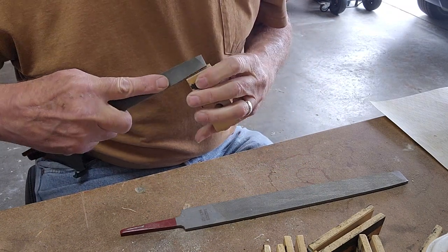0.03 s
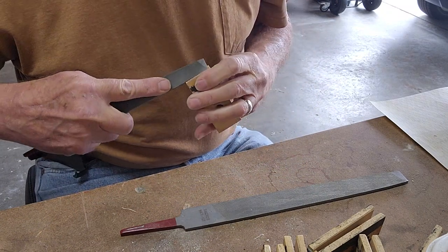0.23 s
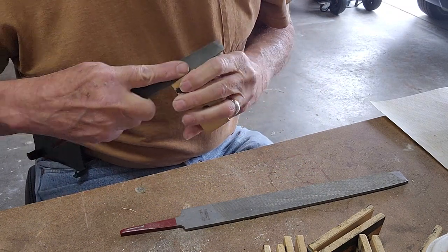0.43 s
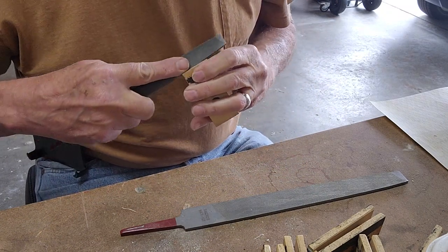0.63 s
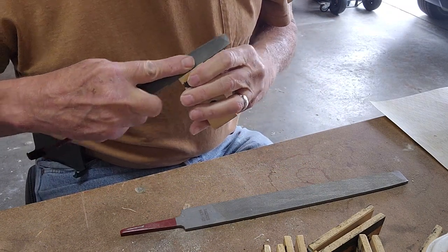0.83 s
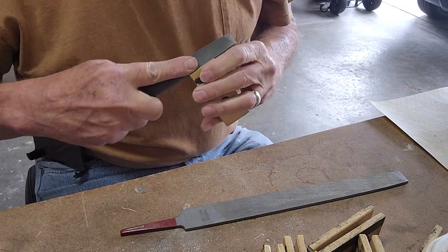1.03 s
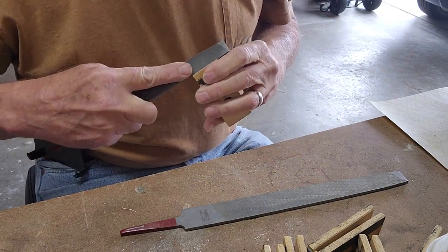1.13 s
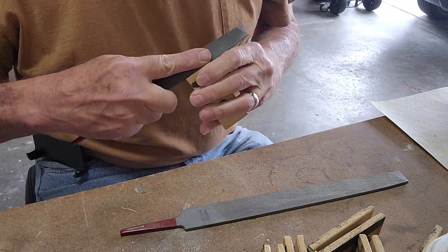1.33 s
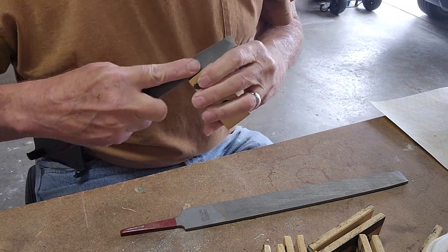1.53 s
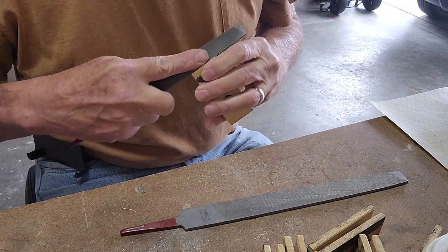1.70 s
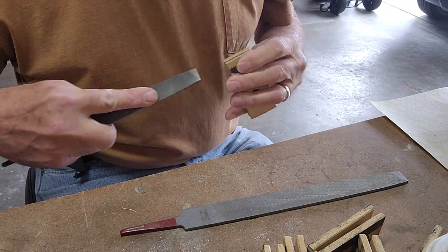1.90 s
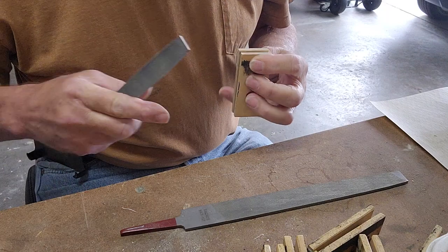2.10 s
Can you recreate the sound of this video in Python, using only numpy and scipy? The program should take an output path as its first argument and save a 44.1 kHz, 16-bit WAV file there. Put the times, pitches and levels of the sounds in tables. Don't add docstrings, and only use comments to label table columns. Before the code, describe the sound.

A steel hand file scrapes a small wooden block in about eight quick alternating strokes, starting after light taps, growing harder and brighter, then stopping; a close stereo microphone in a large workshop with faint low rumble.

```python
import sys
import numpy as np
from scipy import signal
from scipy.fft import rfft, irfft
from scipy.io import wavfile
from scipy.ndimage import uniform_filter1d

SR = 44100
rng = np.random.default_rng(int(sys.argv[2]) if len(sys.argv) > 2 else 0)


def bounce(signal):
    frames = np.transpose(np.atleast_2d(signal))
    limited = np.clip(frames, -1, 1)
    pcm = np.round(limited * 32767).astype(np.int16)
    wavfile.write(sys.argv[1], SR, pcm)


def invert_db(level):
    return 10 ** (np.asarray(level, dtype=float) / 20)


N = 95079
T = np.arange(N) / SR
HZ = np.arange(N // 2 + 1) * SR / N

# (frequency [Hz], density [dB/Hz])
RUMBLE_SWELL = [(0.0, -49.5), (0.44, -48), (0.47, -42), (0.6, -52), (0.75, -44), (0.8, -57.5), (1.03, -43),
                (1.09, -54.5), (1.29, -49), (1.32, -40), (1.89, -46.5), (1.93, -64), (1.98, -48),
                (2.15, -53)]
RUMBLE_SPECTRUM = [(20, -6), (33, -5), (44, 15), (55, 18.5), (68, 9.5), (100, -51.5)]
# (frequency [Hz], density [dB/Hz])
MOTOR_SPECTRUM = [(70, -28), (110, 4), (150, -3.5), (190, -7), (235, -59), (400, -68)]
AIR_SPECTRUM = [(200, -1), (300, -9), (380, 2.5), (500, -4), (2000, -12.5), (7500, -16.5), (9000, -41),
                (14000, -32)]
MOTOR_DB, AIR_DB = -59, -68.5

# (time [s], level [dB])
BENCH_SHAKE = [(0.0, -49.5), (0.12, -47), (0.17, -62), (0.21, -46.5), (0.39, -56), (0.47, -47.5),
               (0.65, -50.5), (0.68, -40.5), (0.79, -51.5), (0.87, -42.5), (0.96, -50), (1.15, -56),
               (1.19, -41), (1.78, -46.5), (1.83, -37), (1.97, -59), (1.99, -48.5), (2.15, -55)]
BENCH_HZ, BENCH_WIDTH_HZ = 86.35, 9

# (time [s], peak [dB], block pitch [Hz], steel pitch [Hz], contact [s])
TAPS = [(0.028, -54.5, 7220, 9560, 0.0093), (.031, -62, 6200, 13500, .01), (.07, -76, 1200, 4500, 0.0029),
        (.11, -68, 5200, 7100, 0.018), (.054, -55.5, 1145, 3235, 0.0022), (.056, -63.5, 1550, 2420, 0.0044),
        (0.128, -60.5, 820, 1850, 0.0023), (.131, -68, 3430, 5230, 0.0068),
        (0.292, -64.5, 1860, 3760, 0.0058), (.498, -61, 14000, 12330, 0.0018),
        (0.922, -67.5, 1100, 2000, 0.0029), (1.825, -77, 920, 2100, 0.005),
        (1.945, -59.5, 2700, 5500, 0.0064), (2.07, -64, 7400, 6480, 0.0071)]
TAP_WIDTH_HZ, TAP_STEEL_DB, TAP_CRACK_DB = 290, -1.5, -35

# (time [s], peak [dB], pitch [Hz], length [s])
SINGS = [(.321, -56, 3250, 0.17), (.331, -64, 810, 0.089), (.341, -58.5, 2486, .06),
         (.391, -54.5, 4390, 0.093), (.401, -59.5, 5570, 0.09), (.415, -54, 1430, 0.035),
         (.421, -58.5, 2420, 0.062), (.551, -63, 3310, 0.18), (.591, -64.5, 584, 0.11),
         (.601, -66, 1100, 0.054), (.621, -60, 1477, .1), (.628, -60, 5300, 0.07), (.635, -54, 4130, 0.081),
         (.641, -69, 6300, 0.058), (0.7715, -51, 2450, 0.12), (.791, -58, 5710, 0.1),
         (.797, -53.5, 3230, 0.071), (.801, -55, 4630, .09), (.806, -60, 1910, 0.092),
         (.821, -51.5, 4100, 0.076), (.991, -68.5, 1040, .04), (1.001, -63, 1630, 0.065),
         (1.011, -58, 3740, 0.091), (1.021, -60, 4800, 0.09), (1.031, -57, 3270, .075),
         (1.148, -55.5, 2455, 0.054), (1.152, -67, 1618, 0.033), (1.181, -56.5, 3690, 0.1),
         (1.188, -54.5, 3164, 0.076), (1.192, -54, 5840, 0.074), (1.201, -63, 724, 0.085),
         (1.338, -53, 1600, 0.042), (1.343, -54, 4830, 0.095), (1.347, -71, 3630, 0.056),
         (1.368, -60.5, 1090, .05), (1.372, -49, 6000, 0.049), (1.511, -58, 2470, 0.07),
         (1.528, -54, 3620, .09), (1.532, -53.5, 3224, 0.043), (1.538, -54.5, 1600, 0.033),
         (1.542, -59.5, 5940, 0.075), (1.681, -51.5, 1530, 0.04), (1.708, -53, 3760, 0.06),
         (1.712, -57, 2480, 0.026), (1.721, -48, 5960, 0.075), (1.731, -64, 1600, 0.04),
         (1.739, -45, 4020, 0.12), (1.75, -36.5, 4840, 0.069), (1.791, -51, 2320, 0.056),
         (1.811, -59.5, 897, 0.034)]
SING_WIDTH_HZ, SING_FLUTTER_DB = 66, 3

# (start [s], length [s], top tooth rate [Hz], level [dB])
BUZZES = [
    (0.331, 0.16, 622, -67.5),
    (0.777, 0.15, 596, -64),
    (1.163, 0.15, 484, -66),
    (1.503, 0.1305, 529, -55.5),
    (1.726, 0.059, 1600, -78),
]
BUZZ_SLOW_RATIO, BUZZ_JITTER_RATIO, BUZZ_SECOND_DB = 0.76, 0.055, -12

# (start [s], length [s], peak [dB], peak place [0-1], steel ring [dB])
PUSHES = [
    (.25, 0.097, -62, 0.2, 1.5),
    (.342, 0.13, -44.5, 0.85, -3),
    (.778, 0.1075, -42, 0.65, -0.5),
    (1.15, 0.14, -44.5, 0.76, -0.5),
    (1.505, 0.11, -43.5, 0.75, 0.5),
]
PULLS = [
    (0.61, 0.11, -42.5, 0.33, -6),
    (0.98753, 0.1, -44.5, 0.61, -3.5),
    (2.03, 0.057, -71.5, 0.45, -5),
    (0.17, .015, -94, .3, -3),
    (.545, 0.079, -63, 0.52, 3),
    (.74, 0.025, -69, .5, 12),
]
HARD_PULLS = [
    (1.343, 0.1, -39.5, 0.39, 0),
    (1.676, 0.17, -37, 0.45, 0.0046),
]
# (frequency [Hz], width [Hz], level [dB])
PUSH_MODES = [(1600, 33, -38), (2460, 68, 6.5), (3210, 64, 1.5), (3740, 54, 6), (4140, 110, -2),
              (4670, 95, 10), (5130, 55, 0), (5360, 76, -1), (6330, 12, 13), (7120, 240, 12),
              (7840, 11, 16.5), (8950, 99, 2), (10300, 77, -19), (14420, 170, 14)]
PULL_MODES = [(1100, 110, -16), (1637, 73, -4.5), (1980, 430, 4.5), (3460, 114, -5), (3720, 64, -10),
              (4380, 300, 4), (4800, 49, 5), (5100, 42, -4), (5930, 73, -1), (6030, 28, -3.5),
              (6080, 170, -13), (7140, 70, -10), (7800, 44, 6.5), (12100, 270, 4)]
HARD_MODES = [(1570, 57, -28.5), (2540, 28, -26.5), (3664, 24, -18), (4120, 35, -15), (4300, 34, -4),
              (4827, 55, 3), (5990, 12, -7), (6260, 22, -5), (6400, 66, -33), (7400, 230, -31),
              (7470, 70, -18), (9100, 32, -14.5), (11880, 270, -5.5), (13950, 220, -7.5)]
# (frequency [Hz], density [dB/Hz])
PUSH_GRIT = [(250, -18.5), (900, -15), (1800, 0.5), (3000, -5.5), (7500, -0.5), (8900, -11), (13500, -4),
             (15800, -22)]
PULL_GRIT = [(250, -12), (900, -5), (1800, -11), (4500, 4.5), (7500, 2), (8900, -5.5), (14000, -2.5),
             (15800, -11)]
HARD_GRIT = [(250, -24), (900, -22.5), (1800, -5.5), (4600, -9), (7500, -1), (9500, -17.5), (14000, -12.5),
             (15800, -12.5)]
PUSH_ATTACK_S, PULL_ATTACK_S, HARD_ATTACK_S, RELEASE_S = 0.0087, 0.018, 0.0042, 0.026
PUSH_RING_DB, PULL_RING_DB, HARD_RING_DB = -9, -10, -4.5
START_DB, HARD_START_DB, END_DB, LIFT_DB = -4, -11.5, -7.5, -44
CLEAR_DB, SILENT_DB = -48, -200
TOUCH_S, TOUCH_DB = 0.011, -18.5
RING_LAW = 1.28
SPIKE_DB, CHATTER_DB, WANDER_DB, GRIP_HZ = 1.5, 0.5, 3.5, 80
MOTTLE_S, DIRECT_GAIN = 0.0044, 10.2

# (frequency [Hz], width [Hz], level [dB])
WORK_DIPS = [(1754, 22, -11), (2814, 108, -8.5), (6946, 99, -15), (8860, 340, -10.5), (11100, 1400, -3)]
ROOM_T60_S, ROOM_DB, ROOM_HZ = 0.19, -16.5, 6300
# (frequency [Hz], left minus right [dB])
BALANCE = [(60, 1), (110, 1.5), (200, -0.5), (380, 2.0), (700, 6.5), (1290, 0), (2380, 7), (4400, -3),
           (8120, 7), (15000, 9.5)]
# (frequency [Hz], left lead [rad])
LEAD = [(0, -1), (1000, 1.31), (1640, 1.87), (3700, 0.8241), (3960, -2.5), (4820, -2.0), (5430, -1.5),
        (6290, 3), (8100, 10), (9040, 12.5), (11100, 1.5), (12200, 1.5), (13500, 5.5), (14300, 3),
        (15400, 3)]
# (frequency [Hz], common share [0-1])
COMMON = [(60, .996), (250, .8), (1000, .8), (3000, .68), (5000, .8), (9000, .52), (15000, .52)]
BASS_IN_STEP_HZ = 300


def unit(x):
    return x / np.sqrt(np.mean(x ** 2))


def read(table):
    hz, value = np.array(table, float).T
    return np.interp(np.log(HZ + 1), np.log(hz + 1), value)


def colour(x, table):
    return unit(irfft(rfft(x) * invert_db(read(table)), N))


def ring(x, hz, width_hz):
    r = np.exp(-np.pi * width_hz / SR)
    angle = 2 * np.pi * hz / SR
    drive = np.sqrt(1 - r * r)
    y = signal.lfilter([drive, 0, -drive], [1, -2 * r * np.cos(angle), r * r], x)
    return y / np.sin(angle) * np.sin(angle / 2 + 1)


def walk(rate_hz):
    hold = int(SR / rate_hz)
    steps = np.repeat(rng.standard_normal(N // hold + 1), hold)
    return 1.3 * uniform_filter1d(uniform_filter1d(steps, hold), hold)[:N]


def steady(x):
    return x / np.sqrt(uniform_filter1d(x ** 2, size=3000) + 0.21)


def level_curve(table):
    return invert_db(np.interp(T, *np.array(table).T))


def shop_air():
    return colour(rng.standard_normal(N), AIR_SPECTRUM) * invert_db(AIR_DB + 0.4 * walk(8.0))


def motor_hum():
    return colour(rng.standard_normal(N), MOTOR_SPECTRUM) * invert_db(MOTOR_DB + 3.9 * walk(11.465))


def machine_rumble():
    return steady(colour(rng.standard_normal(N), RUMBLE_SPECTRUM)) * level_curve(RUMBLE_SWELL)


def bench_thrum():
    inner = ring(rng.standard_normal(N), BENCH_HZ, BENCH_WIDTH_HZ)
    shake = unit(ring(inner, BENCH_HZ, 3 * BENCH_WIDTH_HZ))
    return steady(shake) * level_curve(BENCH_SHAKE)


def background():
    return bench_thrum() + machine_rumble() + motor_hum() + shop_air()


def taps():
    out, noise = np.zeros(N), rng.standard_normal(N)
    for start_s, db, block_hz, steel_hz, contact_s in TAPS:
        u = np.clip(T - start_s, 0, None) / contact_s
        scuff = invert_db(db) * noise * u * np.exp(1 - 2 * u)
        out += ring(scuff, block_hz, TAP_WIDTH_HZ)
        out += invert_db(TAP_STEEL_DB) * ring(scuff, steel_hz, TAP_WIDTH_HZ)
        out += invert_db(TAP_CRACK_DB) * ring(scuff, steel_hz, min(0.2 * steel_hz, 6000))
    return out


def grit():
    size = uniform_filter1d(rng.exponential(size=N), size=5)
    return unit(rng.standard_normal(N) * invert_db(SPIKE_DB * size * 2))


def sings():
    out, clicks = np.zeros(N), grit()
    flutter_db = SING_FLUTTER_DB * walk(59.7)
    for k, (start_s, db, hz, length_s) in enumerate(SINGS):
        arc = np.sin(np.pi * np.clip((T - start_s) / length_s, 0, 1))
        swell = arc * invert_db(np.roll(flutter_db, k * N // len(SINGS)))
        out += invert_db(db) * np.sin(2 * np.pi * hz / SR) * ring(clicks * swell, hz, SING_WIDTH_HZ)
    return out


def buzz():
    out, shake = np.zeros(N), walk(120)
    for start_s, length_s, top_hz, db in BUZZES:
        arc = np.sin(np.pi * np.clip((T - start_s) / length_s, 0, 1))
        speed = BUZZ_SLOW_RATIO + (1 - BUZZ_SLOW_RATIO) * arc ** 4 + BUZZ_JITTER_RATIO * shake
        phase = 2 * np.pi * np.cumsum(top_hz * speed) / SR
        teeth = invert_db(2.9 * walk(52.4)) * np.sin(phase)
        second_gain = invert_db(BUZZ_SECOND_DB + 4.5 * walk(76.35))
        second = second_gain * np.sin(0.36 * phase + 2 * np.pi * 600 * T)
        out += invert_db(db) * np.sqrt(arc) * (teeth + second)
    return out


def stroke_pressure(rows, attack_s, start_db):
    press, steel = np.zeros(N), np.zeros(N)
    levels_db = [CLEAR_DB, TOUCH_DB, start_db, 0, END_DB, LIFT_DB, 2 * CLEAR_DB]
    for start_s, length_s, db, peak, steel_db in rows:
        times_s = start_s + np.array([-attack_s - TOUCH_S, -attack_s, attack_s, peak * length_s,
                                      length_s, length_s + RELEASE_S, length_s + 2 * RELEASE_S])
        env_db = np.interp(T, times_s, levels_db, left=SILENT_DB, right=SILENT_DB)
        press += invert_db(db + env_db)
        steel += invert_db(db + steel_db + RING_LAW * env_db)
    return press, steel


def mottle(x, bodies, mix):
    resonant = sum(m * signal.fftconvolve(x, body)[:N] for body, m in zip(bodies, mix))
    return DIRECT_GAIN * x + resonant


def strokes(rows, attack_s, spectrum, modes, ring_db, start_db):
    press, steel = stroke_pressure(rows, attack_s, start_db)
    chatter = invert_db(CHATTER_DB * walk(150) + 1.35 * walk(35.11))
    wander = [invert_db(db + WANDER_DB * walk(17.88)) for _, _, db in modes]
    bodies = rng.standard_normal((3, 2000)) * np.exp(-T[:2000] / MOTTLE_S)
    mix = np.array([invert_db(5 * walk(12)) for _ in bodies])
    mix = mix / np.sqrt(np.sum(mix ** 2, axis=0))
    ring_gain = invert_db(ring_db) / np.sqrt(np.sum(invert_db(np.array(modes)[:, 2]) ** 2))
    out = []
    for _ in range(2):
        clicks = grit() * chatter
        rung = np.zeros(N)
        for gain, (hz, width_hz, _) in zip(wander, modes):
            rung += ring(clicks * steel * gain, hz, GRIP_HZ + width_hz)
        scrape = colour(mottle(clicks, bodies, mix), spectrum) * press
        out.append(scrape + rung * ring_gain)
    return np.array(out)


def filing():
    work = strokes(PUSHES, PUSH_ATTACK_S, PUSH_GRIT, PUSH_MODES, PUSH_RING_DB, START_DB)
    work += strokes(PULLS, PULL_ATTACK_S, PULL_GRIT, PULL_MODES, PULL_RING_DB, START_DB)
    work += strokes(HARD_PULLS, HARD_ATTACK_S, HARD_GRIT, HARD_MODES, HARD_RING_DB, HARD_START_DB)
    work[0] += buzz() + taps() + sings()
    work[1] += sings()
    return work


def dip_bands(work):
    dips_db = sum(db / (1 + (2 * (HZ - hz) / width_hz) ** 2) for hz, width_hz, db in WORK_DIPS)
    return irfft(rfft(work) * invert_db(dips_db), N)


def room(work):
    t = T[:SR // 2]
    tail = rng.standard_normal((2, len(t))) * invert_db(-60 * t / ROOM_T60_S) * (t > 0.004)
    tail = signal.sosfilt(signal.butter(2, ROOM_HZ, fs=SR, output="sos"), tail)
    tail = tail / np.sqrt(np.sum(tail ** 2) / 2)
    return invert_db(ROOM_DB) * signal.fftconvolve(work[:1], tail, axes=1)[:, :N]


def ports(shared, separate):
    common = np.clip(read(COMMON), 0, 1)
    balance = invert_db(read(BALANCE) / 2)
    lead_rad = np.interp(HZ, *np.array(LEAD).T) * np.minimum(HZ / BASS_IN_STEP_HZ, 1)
    turn = np.exp(0.5j * lead_rad)
    mid = rfft(shared) * np.sqrt((1 + common) / 2)
    side = rfft(separate) * np.sqrt((1 - common) / 2)
    left = irfft((mid + side) * balance * turn, N)
    right = irfft((mid - side) / balance / turn, N)
    return np.array([left, right])


def scene():
    work = dip_bands(filing())
    return ports(work[0] + background(), work[1] + background()) + room(work)


def band_limit(x):
    return signal.sosfilt(signal.butter(12, 15820, fs=SR, output="sos"), x)


def record(dry):
    return band_limit(dry)


dry = scene()
out = record(dry)
bounce(out)
```